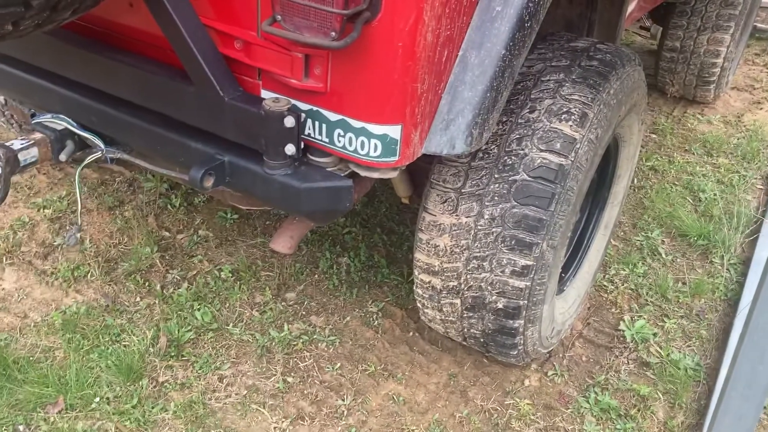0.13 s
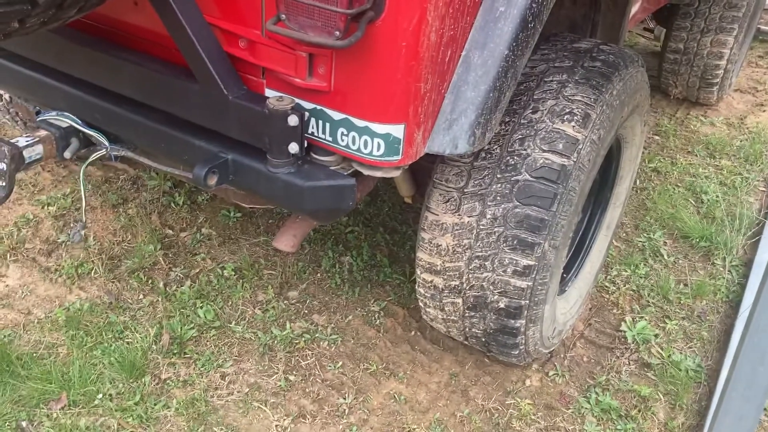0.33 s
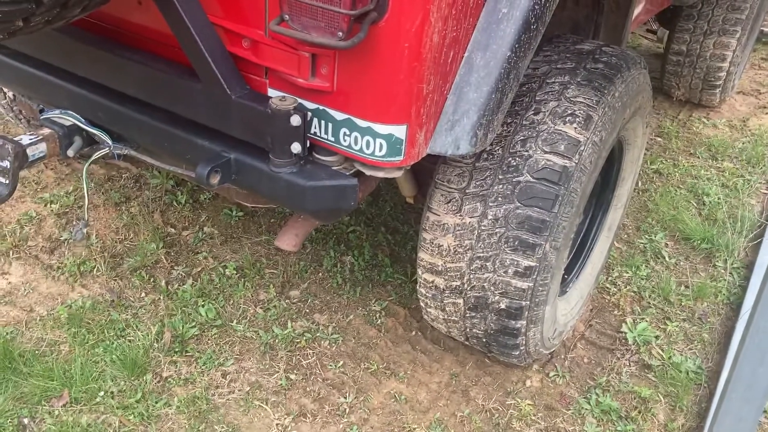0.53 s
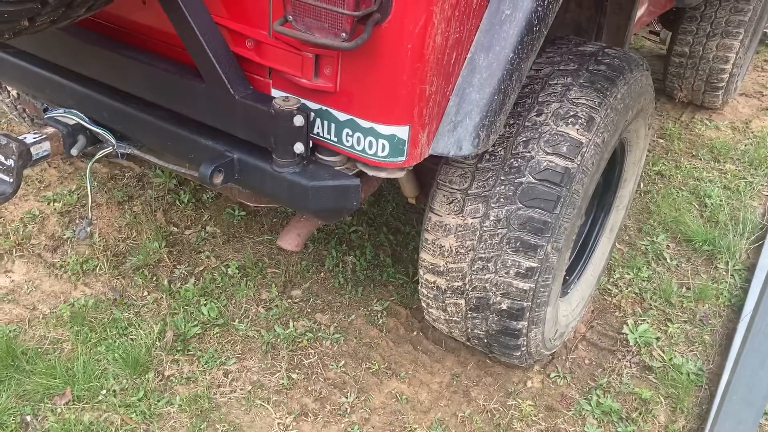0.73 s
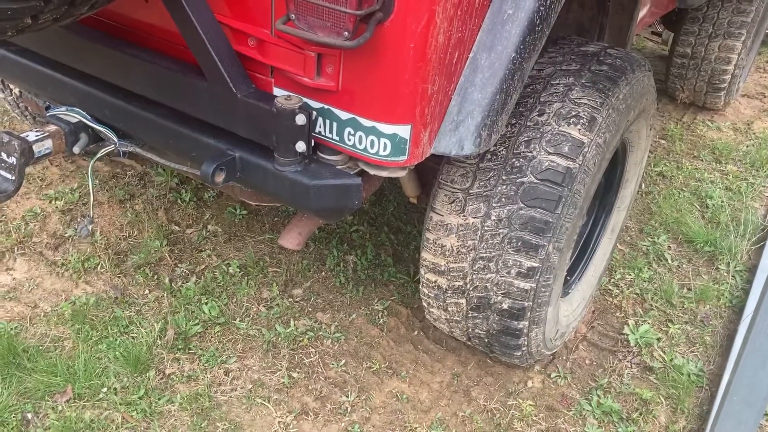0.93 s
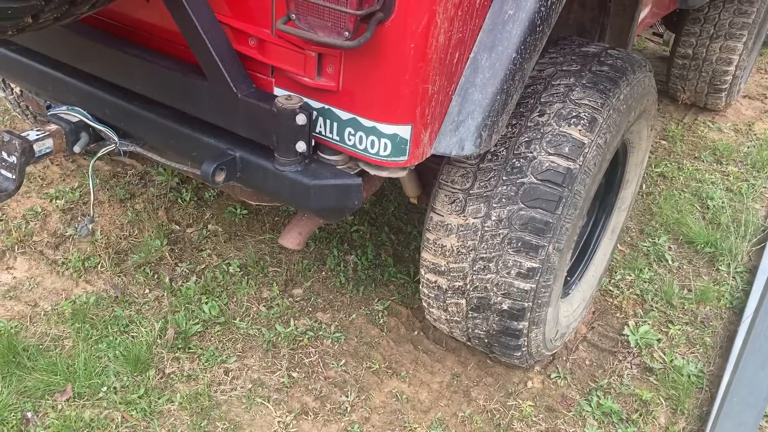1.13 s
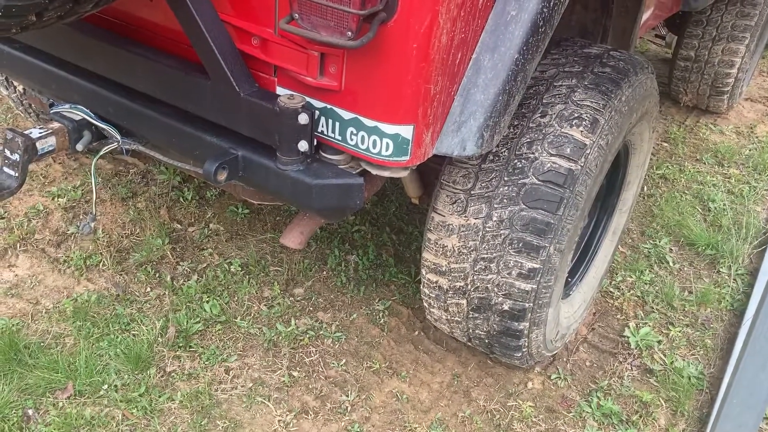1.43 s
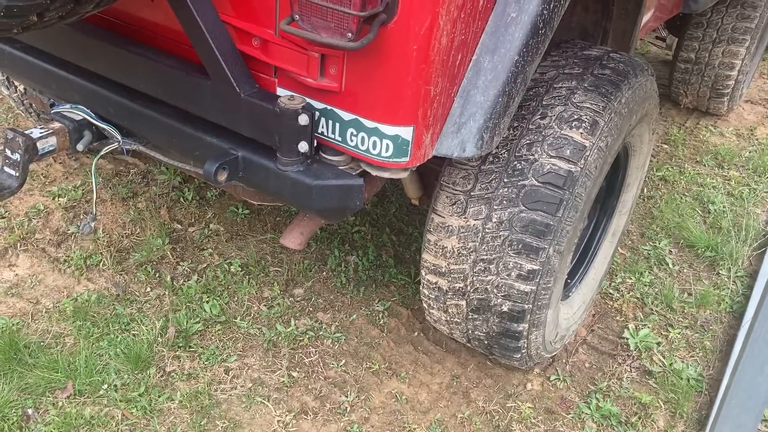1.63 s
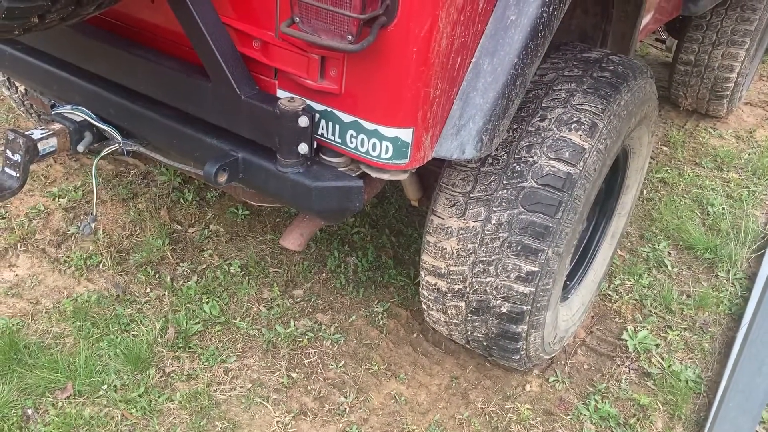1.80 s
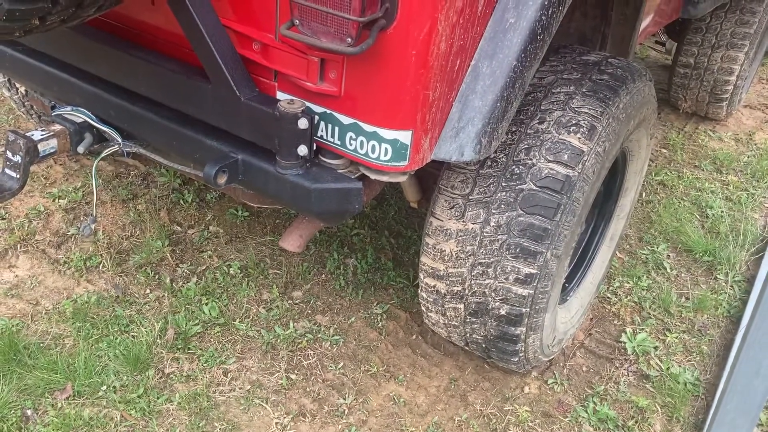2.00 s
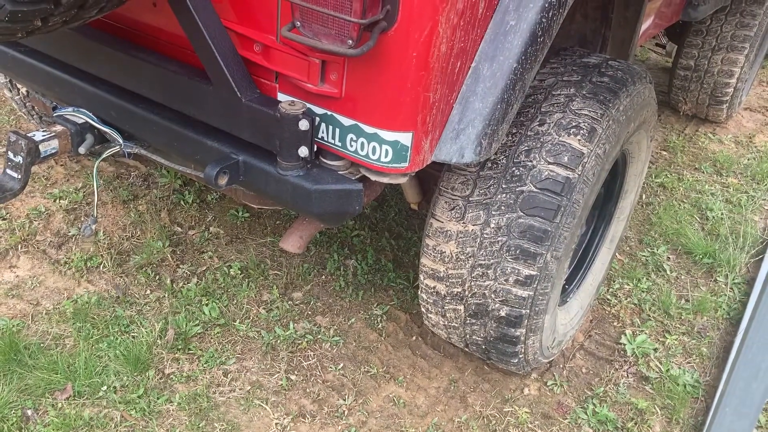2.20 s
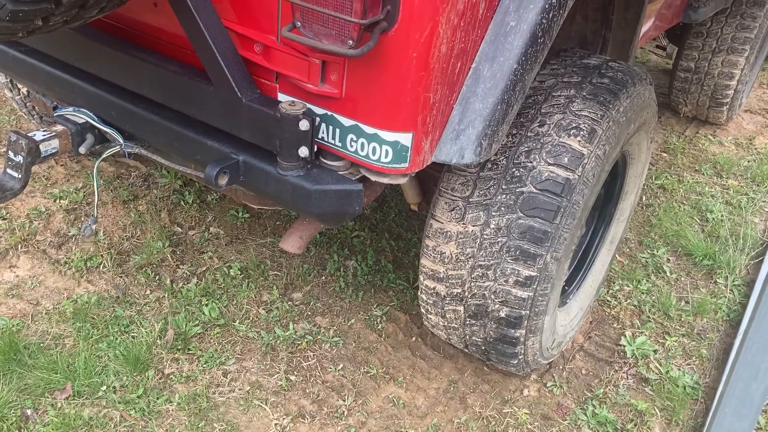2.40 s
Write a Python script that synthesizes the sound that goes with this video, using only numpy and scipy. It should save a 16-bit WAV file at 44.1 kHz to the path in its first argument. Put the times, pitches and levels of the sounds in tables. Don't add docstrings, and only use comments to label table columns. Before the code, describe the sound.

Close exhaust rumble of a parked off-road vehicle, idling steadily with valve clatter and rushing air.

```python
import sys
import numpy as np
from scipy import signal
from scipy.fft import rfft, irfft
from scipy.io import wavfile
from scipy.ndimage import uniform_filter1d

SR = 44100
rng = np.random.default_rng(int(sys.argv[2]) if len(sys.argv) > 2 else 0)


def digitize_waveform(pressure):
    field = np.atleast_2d(pressure).T
    bounded = np.clip(field, -1, 1)
    quanta = np.round(bounded * 32767).astype(np.int16)
    wavfile.write(sys.argv[1], SR, quanta)


def gain_from_db(level_db):
    decades = np.asarray(level_db, float) / 20
    return 10 ** decades


N = 112455
LEAD = SR // 2
KNOCK_TURN = 0.99
RISE_S = 0.0007

KNOCK_BY_CYL_DB = [-8, 0, -8.5, -6]


def firings(at_turn):
    # (time [s], rate [firings per s])
    idle_speed = [(0.101, 30.52), (0.224, 31.42), (0.415, 30.43), (0.518, 31.54), (0.671, 30.38),
                  (0.822, 31.73), (0.947, 30.65), (1.07, 31.56), (1.222, 29.82), (1.342, 31.47),
                  (1.5, 30.38), (1.63, 31.06), (1.89, 31.03), (1.994, 30.42), (2.115, 31.59),
                  (2.255, 30.28), (2.39, 31.64), (2.473, 30.28)]
    t = np.arange(-LEAD, N) / SR
    turns = np.cumsum(np.interp(t, *np.transpose(idle_speed))) / SR
    count = np.arange(-12, 79)
    times = np.interp(count + at_turn, turns - turns[LEAD], t)
    return times, count % 4


def train(times, gains):
    out = np.zeros(N + LEAD)
    at = np.round(times * SR).astype(int) + LEAD
    np.add.at(out, np.clip(at, 0, len(out) - 1), gains)
    return out


def exhaust():
    # (frequency [Hz], width [Hz], level [dB], sign)
    pipe_modes = [(40, 7, -24.5, -1), (62.5, 2.8, -45, 1), (93.2, 52.8, -6.9, 1), (116.5, 13.2, -11.9, -1),
                  (180.9, 6.7, -38.2, 1), (209.9, 16.3, -22.8, -1), (249.6, 9.9, -44, -1)]
    puff_by_cyl = [0.74, -0.45, .3, -0.018]
    late_by_cyl = [.0001, -.0001, .0002, -.0002]
    puff_db, scatter_db, jitter_s, top_hz = 0.37, 0.77, 0.00014, 340
    times, cyl = firings(at_turn=0.21)
    size = gain_from_db(puff_db + np.array(puff_by_cyl)[cyl] + scatter_db * rng.standard_normal(len(times)))
    late = np.array(late_by_cyl)[cyl] + jitter_s * rng.standard_normal(len(times))
    t = np.arange(SR) / SR
    ring = np.zeros(SR)
    for hz, width, db, sign in pipe_modes:
        ring += sign * gain_from_db(db) * np.exp(-np.pi * width * t) * np.sin(2 * np.pi * hz * t)
    out = signal.fftconvolve(train(times + late, size), ring)
    soften = signal.butter(3, top_hz, fs=SR, output="sos")
    return signal.sosfiltfilt(soften, out)[LEAD:][:N]


def knock_noise(by_cyl_db, rest_db, fade_s, scatter_db, hard_column=0, strike=0):
    # (time [s], wide clatter [dB], 4.2 kHz ring [dB], 5.2 kHz ring [dB])
    hard_knocks = [(0.0328, -25.5, -30, -23), (0.165, -26, -33.5, -21), (0.2264, -29.5, -65, -43),
                   (0.2912, -21.5, -41, -46), (0.3566, -26, -31, -24), (0.4234, -26.5, -38, -24),
                   (0.5511, -25, -32.5, -26), (0.6165, -26.5, -36.5, -52), (0.6818, -26.5, -35, -32),
                   (0.8096, -24.5, -36.5, -17), (0.9368, -25.5, -50, -23), (1.0021, -27.5, -41, -25),
                   (1.066, -25, -37, -20), (1.1972, -25.5, -40, -21), (1.2594, -32, -38, -54),
                   (1.3264, -27, -40, -23), (1.3902, -29.5, -33.5, -29), (1.4551, -24.5, -30.5, -39),
                   (1.5878, -24.5, -43, -19.5), (1.6511, -25, -35, -25), (1.715, -25, -43, -19),
                   (1.7828, -28.5, -31, -37), (1.8452, -24.5, -40, -21), (1.9076, -23, -34, -36),
                   (1.9749, -25.5, -36, -32), (2.1096, -27.5, -30, -26), (2.2333, -25.5, -49, -23),
                   (2.363, -28, -36, -22.5), (2.4244, -27.5, -33.5, -61), (2.4927, -25.5, -41, -21)]
    rebound_s, rebound_db, hard_scatter = 0.0115, -7, 0.3
    times, cyl = firings(KNOCK_TURN)
    luck = np.clip(rng.standard_normal((len(times), 3)), -2, 1.5)
    base_db = np.roll(by_cyl_db, -1)[cyl]
    spread_db = np.full(len(times), float(scatter_db))
    if hard_column:
        hard = np.array(hard_knocks)
        nearest = abs(times[:, None] - hard[:, 0]).argmin(0)
        times[nearest] = hard[:, 0] - RISE_S
        base_db[nearest] = hard[:, hard_column] - np.median(hard[:, hard_column])
        spread_db[nearest] = hard_scatter * scatter_db
    hits = train(times, gain_from_db(base_db + spread_db * luck[:, 0]))
    rebound_times = times + rebound_s * (1 + 0.36 * luck[:, 2])
    hits += train(rebound_times, gain_from_db(base_db + rebound_db + scatter_db * luck[:, 1]))
    t = np.arange(SR // 10) / SR
    shape = (1 - np.exp(-t / RISE_S)) * np.exp(-t / fade_s)
    loudness = gain_from_db(rest_db) + signal.oaconvolve(hits, shape)[LEAD:][:N]
    x = loudness * rng.standard_normal(N) + strike * hits[LEAD:]
    return x / x.std()


def resonate(x, hz, width):
    r = np.exp(-np.pi * width / SR)
    y = signal.lfilter([1, 0, -1], [1, -2 * r * np.cos(2 * np.pi * hz / SR), r * r], x)
    return y / y.std()


def block_rings():
    # (frequency [Hz], width [Hz], rms level [dB])
    ring_modes = [(3150, 54, -40), (3220, 170, -45.5), (4128, 64, -47), (4156, 50, -40.5),
                  (3560, 150, -40.5), (4763, 88, -45.5), (5235, 50, -41.5), (5186, 48, -51)]
    ring_columns = (1, 1, 2, 2, 1, 1, 3, 3)
    out = np.zeros(N)
    for (hz, width, db), column in zip(ring_modes, ring_columns):
        blows = knock_noise(KNOCK_BY_CYL_DB, rest_db=-20, fade_s=0.0037, scatter_db=3.5,
                            hard_column=column, strike=9)
        softened = resonate(resonate(blows, hz, width), hz, 450)
        out += gain_from_db(db) * softened
    return out


def clatter():
    # (frequency [Hz], density [dB per Hz])
    clatter_spectrum = [(700, -80), (1500, -71), (2600, -77.5), (3300, -73), (5800, -83.5), (8000, -76),
                        (11000, -82), (15500, -90)]
    blows = knock_noise(KNOCK_BY_CYL_DB, rest_db=-27, fade_s=0.0096, scatter_db=1.8, hard_column=1)
    return coloured(blows, clatter_spectrum)


def panels():
    # (frequency [Hz], width [Hz], rms level [dB])
    panel_modes = [(199.6, 7.3, -40.5), (229, 12, -41.5), (420.6, 13.7, -46.5), (441.5, 10, -46),
                   (549.5, 21, -43.5), (650.6, 26, -44.5), (828, 37, -51.5), (1118, 17, -49),
                   (1176, 30, -45.5), (1316, 120, -43), (1524, 70, -47.5), (1848, 62, -42)]
    shake_by_cyl = [0.069, -1.1, 0.6, 0.61]
    out = np.zeros(N)
    for hz, width, db in panel_modes:
        shaking = knock_noise(shake_by_cyl, rest_db=-5, fade_s=0.0068, scatter_db=4)
        out += gain_from_db(db) * resonate(shaking, hz, width)
    return out


def belt_whine():
    return gain_from_db(-50) * resonate(rng.standard_normal(N), hz=3598, width=30)


def rush():
    # (frequency [Hz], density [dB per Hz])
    rush_spectrum = [(25, -81), (110, -72.5), (260, -66.5), (900, -81), (1500, -81.5), (2600, -74.5),
                     (5800, -81), (15500, -90.5)]
    return coloured(rng.standard_normal(N), rush_spectrum)


def coloured(x, points):
    hz = np.fft.rfftfreq(N, 1 / SR)
    return irfft(rfft(x) * gain_from_db(read(points, hz)) * np.sqrt(SR / 2), N)


def read(points, hz):
    f, value = np.transpose(points)
    return np.interp(np.log(hz + 1), np.log(f + 1), value)


def two_ports(x):
    # (frequency [Hz], left lead [rad])
    port_phase = [(0, 0), (2100, .4), (3220, 3.1), (5500, 5.8), (7000, 5.9), (8900, 3.2), (11300, .01),
                  (15800, -6.3)]
    # (frequency [Hz], left over right [dB])
    port_balance = [(60, .6), (150, .9), (380, 2), (700, 3.1), (1300, 2.5), (2400, 1.4), (4400, 0),
                    (15000, 0)]
    # (frequency [Hz], likeness [0-1])
    port_same = [(200, 1), (500, .88), (1500, .9), (2200, .6), (3100, .95), (5800, .6), (8000, .93),
                 (15000, .9)]
    t = np.arange(4096) / SR
    bounce = rng.standard_normal(len(t)) * np.exp(-t / 0.025)
    bounced = signal.oaconvolve(x, bounce / np.linalg.norm(bounce))[:N]
    hz = np.fft.rfftfreq(N, 1 / SR)
    same = np.clip(read(port_same, hz), 0, 1)
    tilt = gain_from_db(read(port_balance, hz) / 2)
    turn = np.exp(-1j * np.interp(hz, *np.transpose(port_phase)))
    direct = rfft(x)
    right = (same * direct * turn + np.sqrt(1 - same ** 2) * rfft(bounced)) / tilt
    return np.array([irfft(direct * tilt, N), irfft(right, N)])


def scene():
    engine = exhaust() + block_rings() + clatter() + panels() + belt_whine() + rush()
    return two_ports(engine)


def top_cut(x):
    return signal.sosfilt(signal.butter(12, 17050, fs=SR, output="sos"), x)


def record(dry):
    mask_from_hz, mask_db, quiet_db = 7000, -6, -71.5
    low_cut_hz, edge_hz = 14, 15830
    hz, _, z = signal.stft([dry[0] + dry[1], dry[0] - dry[1]], SR, nperseg=2048)
    hz = hz[:1024]
    bands = abs(z[:, :1024].reshape(2, 64, 16, -1)) ** 2
    power = bands.mean(2)
    louder = uniform_filter1d(power.max(0), size=3, axis=0)
    mask = np.maximum(louder * gain_from_db(2 * mask_db), gain_from_db(2 * quiet_db))
    keep = np.repeat(power > mask, 16, 1) | (hz[:, None] < mask_from_hz)
    in_band = (hz > low_cut_hz) & (hz < edge_hz)
    z[:, :1024] *= keep * in_band[:, None]
    mid, side = signal.istft(z, SR, nperseg=2048)[1][:, :N] / 2
    return top_cut(np.array([mid + side, mid - side]))


dry = scene()
out = record(dry)
digitize_waveform(out)
```